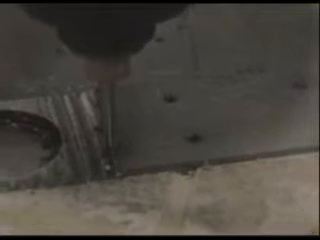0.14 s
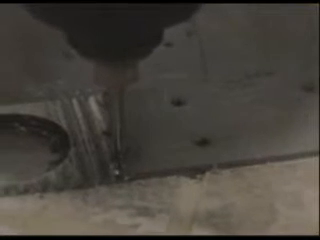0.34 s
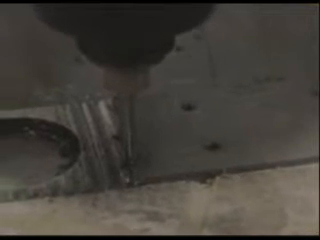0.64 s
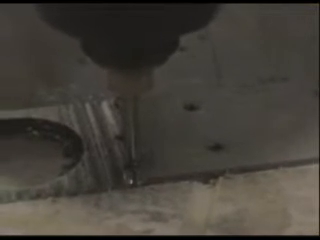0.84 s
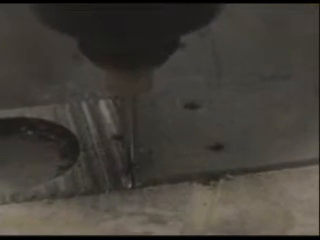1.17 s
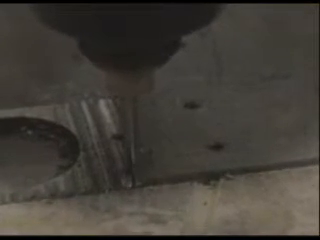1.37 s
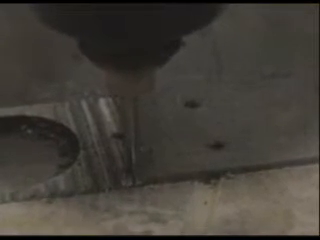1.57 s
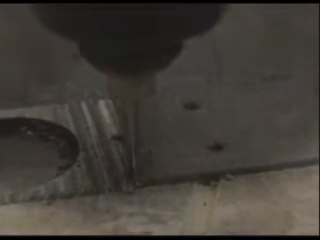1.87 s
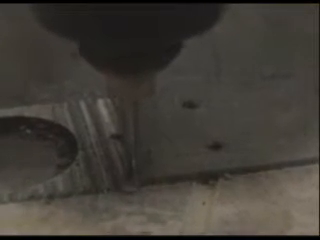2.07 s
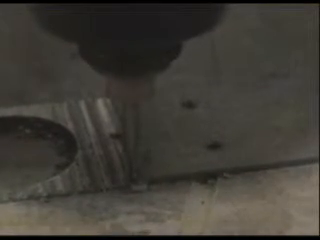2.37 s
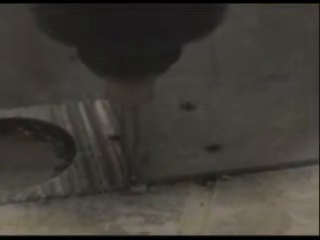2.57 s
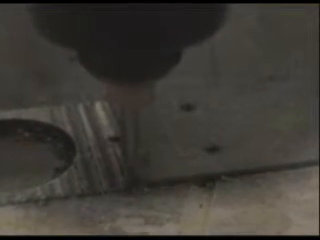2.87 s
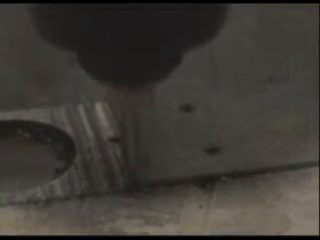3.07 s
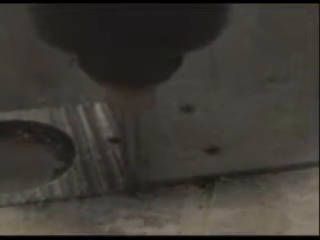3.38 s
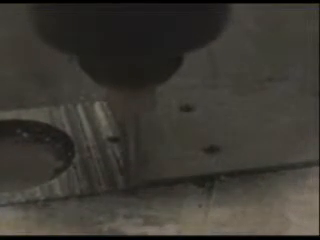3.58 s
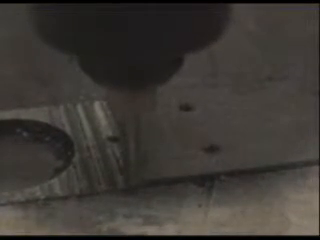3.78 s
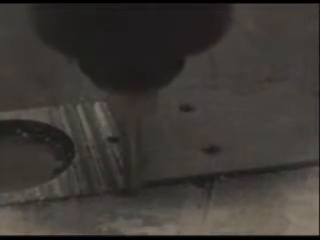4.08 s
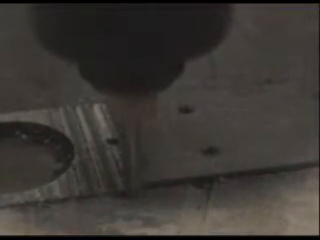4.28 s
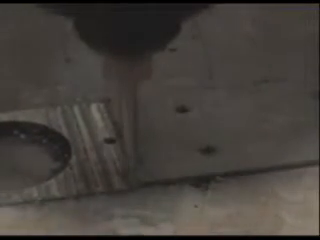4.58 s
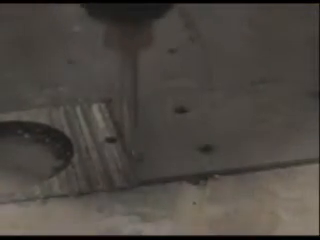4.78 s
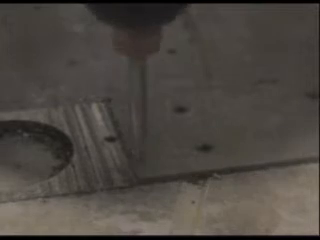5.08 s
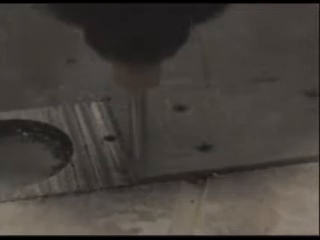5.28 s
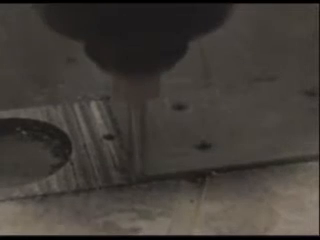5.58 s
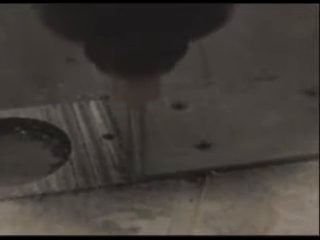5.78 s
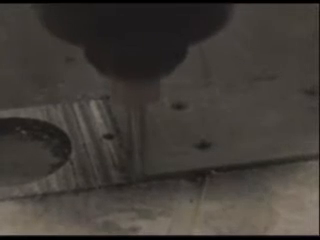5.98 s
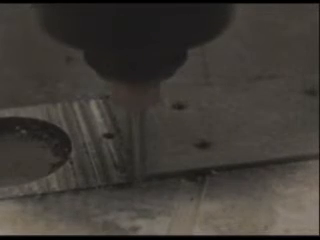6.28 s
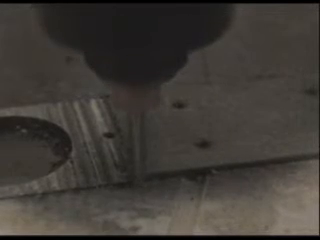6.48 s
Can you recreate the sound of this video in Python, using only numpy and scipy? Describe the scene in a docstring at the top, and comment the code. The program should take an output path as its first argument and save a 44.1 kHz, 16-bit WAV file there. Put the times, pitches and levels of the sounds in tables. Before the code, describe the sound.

From 0 s a small cutter mills steel at close range: a loud, dense buzz around 430 Hz and its upper partials, with gritty chip noise, tiny ticks and metallic ringing near 5 kHz. Beneath it, a spindle motor whines near 2.5 kHz with a throbbing rasp and broad fan rush. Short screechy snags come at about 1.5, 2.0, 2.4 and 2.7 s. At 2.85 s the cutter breaks out with a brief squeal; the buzz drops away, and a rougher rubbing drone swells around 3.1 s, with last scrapes until 3.5 s. The spindle then runs free, whine and air more exposed, thin steady tones above 5 kHz. From 4.33 to 5.3 s three quiet axis-motor hums glide up and down, with frame jolts near 4.4, 5.05 and 5.27 s and soft microphone thumps. Whirring continues to 6.6 s. Close stereo, mostly left-leaning, with short diffuse reflections and faint handling rumble.

```python
"""Workshop, close stereo microphones: a CNC router mills steel plate with a small two-flute cutter.
From the start the flutes bite twice a turn, as shaft-locked partials, gritty noise and a ringing cutter.
The motor whines at its commutator rate and blows filtered noise throughout, over handling rumble.
At 2.85 s the tool breaks out and squeals, rubs once a turn, then runs free as thin drive tones stand out.
From 4.33 s an axis motor lifts the head and lowers it again: three gliding hums, with jolts of the frame."""
import sys
import numpy as np
from scipy import signal
from scipy.fft import rfft, irfft, next_fast_len
from scipy.io import wavfile

SR = 44100
rng = np.random.default_rng(int(sys.argv[2]) if len(sys.argv) > 2 else 0)


def unload_audio(sound):
    """Save the sound as a 16-bit wav file, at the path given as the first command line argument."""
    columns = np.transpose(np.atleast_2d(sound))
    # keep every value between -1 and 1, then stretch to whole-number steps
    steps = np.round(np.clip(columns, -1, 1) * 32767)
    wavfile.write(sys.argv[1], SR, steps.astype(np.int16))


N = 292824
TIME = np.arange(N) / SR

# Flutes biting, before the levels of the parts: t/s, level/dB
BITE_LEVEL = [(0, -28.5), (.12, -26), (1.47, -26), (1.64, -29), (1.85, -26.5), (1.96, -28.5), (2.5, -25.5),
              (2.69, -27), (2.85, -37.5)]
# Partials while biting: multiple of spindle speed, level/dB relative to the bite
BITE_ORDERS = [(2, -3.5), (3, -20), (4, -2.5), (6, 0.6), (7, -18), (8, -9), (9, -15), (10, -1.5), (11, -11),
               (12, -4.5), (13, -7.5), (14, -12), (15, -10.5), (16, -9.5), (17, -15), (18, -8.5), (19, -21),
               (20, -10.5), (21, -9), (22, -7), (23, -6.5), (24, -6), (25, -13.5), (26, -12), (27, -17.5)]
# Noise colour of the sheared chips: f/Hz, relative level/dB per Hz
CHIP_COLOUR = [(150, -34), (350, -14), (500, -17.5), (580, 5), (750, -15), (950, -11), (1250, -1.5),
               (1550, -5.5), (2300, 1), (3300, -5.5), (4400, -1), (5500, -10.5), (6200, -3.5), (7800, -4.5),
               (8300, -11.5), (8800, -38)]
# Resonances of the cutter under load, and when it only rubs: f/Hz, width/Hz, relative level/dB
CUTTER_MODES = [(4645, 42, 0), (4910, 570, -12), (5073, 49, -1.5), (5460, 53, -12.5)]
SCRAPE_MODES = [(5010, 110, 0)]
# Snags that make the cutter screech: t/s, level/dB, bell width/s
SNAGS = [(1.518, -25, .03), (2.02, -23, .02), (2.43, -28, .015), (2.662, -32, 0.015), (2.79, -27, 0.014),
         (2.851, -21.5, 0.019), (2.963, -25, .025), (3.344, -27, .015), (3.488, -22.5, .018)]
# Recording gain on the background sounds, held down during the cut, recovering after it
# and after jolts: t/s, level/dB
RECORDING_GAIN = [(0, -5), (1.25, -4), (1.65, -5), (2.5, -4.5), (2.79, -2.5), (2.89, -5), (3.35, -3),
                  (3.75, .3), (4.3, 0.5), (5.02, -0.5), (5.1, -2), (5.47, 0), (6.2, -0.55), (6.64, .5)]
# Noise colour of the cooling air: f/Hz, relative level/dB per Hz
AIR_COLOUR = [(60, -73.5), (105, -43), (150, -26.5), (210, -22.5), (330, -16.5), (520, -16.5), (850, -13.5),
              (1250, -8), (1700, -11.5), (2400, -10), (3100, -4.5), (5000, -5.5), (6400, -9.5),
              (7200, -15.5), (7800, -17.5), (8400, -27.5), (8900, -63)]
# Resonances of the air vent, the frame and the brushes: f/Hz, width/Hz, relative level/dB
VENT_MODES = [(4120, 95, 0)]
FRAME_MODES = [(652, 67, -4.5), (1095, 64, 1.5), (1225, 116, -3)]
BRUSH_MODES = [(2920, 83, 0)]
# Commutator whine split by the rectified mains: ripple sideband number, relative level/dB
WHINE_SIDEBANDS = [(0, -2), (1, 2), (2, 4), (3, -2.5), (4, -8.5)]
# Noise colour of handling: f/Hz, relative level/dB per Hz
RUMBLE_COLOUR = [(10, -7), (25, -4), (50, -6.5), (100, -18.5), (200, -36), (500, -85)]
# Soft thumps on the microphone: t/s (each peaks 0.025 s later), level/dB (each sounds 5 dB lower)
THUMPS = [(2.818, -53), (5.022, -47), (5.245, -52), (5.507, -46), (5.689, -50)]
# Steady tones of the axis drives, before their common strength: f/Hz, level/dB
DRIVE_TONES = [(7633, -38.5), (8366, -49.5), (5366, -48)]
# Common strength of the drive tones: t/s, level/dB
DRIVE_LEVEL = [(2.6, -25), (2.9, -8), (3.7, -2.5), (4.6, 3.5), (6.3, -2)]
# Partials while rubbing: multiple of spindle speed, level/dB relative to the rub
RUB_ORDERS = [(2, -20.5), (3, -15), (4, -8.5), (5, -6), (6, -.5), (7, -14.5), (8, -4.5), (9, -10),
              (10, -15.5), (11, -13.5), (22, -11), (23, -10), (24, -12)]
# Squeal as the tool catches: multiple of spindle speed, level/dB
SQUEAL_ORDERS = [(5, -23), (22, -24.5)]
# Moves of the lift motor: start t/s, length/s, top pitch f/Hz, level/dB before its partials
LIFT_MOVES = [(4.33, .46, 216.3, -44.5), (4.801, .19, 192, -43), (5.03, .28, 252, -41)]
# Hum of the lift motor: multiple of its pitch, level/dB relative to the move
LIFT_ORDERS = [(1, -4), (2, -1), (4, -4)]
# Frame shudders as the axis starts and stops: t/s, level/dB, bell width/s
SHUDDERS = [(4.38, -26, .025), (5.041, -23.5, 0.022), (5.269, -23, 0.015)]
# Noise colour of those shudders: f/Hz, relative level/dB per Hz
JOLT_COLOUR = [(120, -25), (300, -7), (600, 0), (1200, 5.5), (2200, -2.5), (5000, -10), (8500, -31)]
# Place between the microphones, tool and machine: f/Hz, left minus right level/dB
TOOL_PAN = [(200, -1), (430, -1.5), (850, 1.5), (1300, 7.5), (2800, 4.5), (4900, 6), (8400, -1.5)]
MACHINE_PAN = [(200, .5), (550, 6.7), (1100, 3.7), (2800, 4.7), (4900, 3.9), (8400, 2)]
# Diffuse reflections: f/Hz, side level/dB
SPREAD = [(100, 2.5), (400, -11), (1200, -21), (3000, -27.5), (5000, -12), (8000, -11.5)]

# Spindle speed, turns a second: running free, sag at full load, overshoot when the load lets go
FREE_HZ, SAG_HZ, OVERSHOOT_HZ = 214.5, 1.3, 1.0
FULL_BITE_DB = -26
BEAT_HZ = 196.55  # the sound throbs at the spindle speed minus this
# Breakout from the cut, and the time the spindle takes to settle
BREAKOUT_S, SETTLE_S = 2.85, 0.1666
SQUEAL_RISE_S, SQUEAL_FALL_S = 0.019, 0.035
# Rubbing past the wall of the cut: closest moment, rise, fall, level
RUB_S, RUB_RISE_S, RUB_FALL_S, RUB_DB = 3.13, 0.23, 0.18, -23.5
# Cutter ringing: under full load, at the firmest rub, random swing
RING_BITE_DB, RING_RUB_DB, RING_SWING_DB = -28.5, -30.5, 1.5
AIR_DB, WHINE_DB, FRAME_DB, WHINE_SWING = -20.5, -24.5, -29.5, 1.47
# Shaft hum, and its swell at the breakout
HUM_DB, HUM_SWELL_DB, HUM_RISE_S, HUM_FALL_S = -49, 4, 0.16, 0.3
# Commutator bars, and the ripple of the rectified mains
BARS, RIPPLE_HZ = 12, 120
LIFT_START_HZ = 125
# Quick unsteadiness of the bite and of the background level
BITE_SWING_DB, BACKGROUND_SWING_DB = 0.4, 0.62
TOP_HZ = 8850  # band limit of the recorder


def amp(db):
    """Amplitude for a level in dB."""
    return 10 ** (np.asarray(db) / 20)


def unit(x):
    """x scaled to rms 1."""
    return x / np.sqrt(np.mean(x ** 2) + 1e-20)


def along(points, hz):
    """Value at each frequency, interpolated on a log axis."""
    f, value = np.transpose(points)
    return np.interp(np.log(hz + 1), np.log(f + 1), value)


def curve(rows):
    """One value per sample, straight between the rows."""
    t, value = np.transpose(rows)
    return np.interp(TIME, t, value)


def until(rows, fade):
    """Gain that dies away after the last row of a curve."""
    return np.exp(-np.maximum(TIME - rows[-1][0], 0) / fade)


def swell(s, length):
    """A bell-shaped rise and fall around s."""
    return np.exp(-.5 * ((TIME - s) / length) ** 2)


def arch(s, rise, fall):
    """A rounded peak at s with its own rise and fall times."""
    return np.where(TIME < s, swell(s, rise), swell(s, fall))


def wobble(rate):
    """A smooth random curve through rate knots a second."""
    knots = rng.standard_normal(int(N * rate / SR) + 4)
    smooth = signal.resample_poly(knots, 6, 1)
    places = np.linspace(0, len(knots), len(smooth), endpoint=False)
    return 0.89 * np.interp(TIME * rate, places, smooth)


def filtered(x, response):
    """x times a complex response of frequency."""
    m = next_fast_len(N + SR // 4)
    spectrum = rfft(x, m) * response(np.fft.rfftfreq(m, 1 / SR))
    return irfft(spectrum, m)[..., :N]


def coloured(x, colour):
    """x with the given spectrum, at rms 1."""
    return unit(filtered(x, lambda hz: amp(along(colour, hz))))


def ringing(x, modes):
    """x through resonances whose signs alternate, at rms 1."""
    def response(f):
        total = 0
        for k, (centre, width, db) in enumerate(modes):
            damping = 1j * f * width
            total = total + (-1) ** k * amp(db) * damping / (centre ** 2 - f ** 2 + damping)
        return total
    return unit(filtered(x, response))


def noise():
    """Fresh white noise."""
    return rng.standard_normal(N)


def bursts(cycles, sharpness):
    """A gate of rms 1 that opens once a cycle."""
    return unit(np.exp(sharpness * np.cos(2 * np.pi * cycles)))


def partials(turns, orders, flutter_db, flutter_rate):
    """Lines locked to the shaft, each fluttering on its own; 0 dB is rms 1."""
    total = np.zeros(N)
    for order, db in orders:
        flutter = amp(flutter_db * wobble(flutter_rate))
        line = np.sin(2 * np.pi * (order * turns + rng.random()))
        total += amp(db) * unit(flutter * line)
    return total


def cutting(turns, bite, beat):
    """Each flute shears a chip: a buzz strongest on even orders, gritty noise and ticks of flying chips."""
    uneven = turns + 0.0042 * wobble(160)  # the flutes meet the steel slightly early or late
    low = [row for row in BITE_ORDERS if row[0] < 5]
    loudest = [row for row in BITE_ORDERS if row[0] == 6]
    high = [row for row in BITE_ORDERS if row[0] > 6]
    buzz = partials(uneven, low, flutter_db=0.82, flutter_rate=25)
    chatter = partials(uneven, loudest, flutter_db=0.45, flutter_rate=45)
    edge = partials(uneven, high, flutter_db=2.0, flutter_rate=55)
    # the loudest partial throbs with the beat and its octaves
    throb = unit(1 + .38 * np.sin(beat) + .22 * np.cos(2 * beat) + .22 * np.sin(4 * beat))
    grit = noise() * bursts(2 * turns, sharpness=0.27) * amp(2.6 * wobble(900))
    ticks = unit(noise() * (rng.random(N) < 25 / SR))  # about 25 a second
    chips = coloured(grit + amp(-17.5) * ticks, CHIP_COLOUR)
    return bite * (buzz + throb * chatter + amp(-1) * edge + amp(-2.0) * chips)


def screech(turns, load, touch):
    """The slender cutter rings: twice a turn under load, once and more broadly when it only rubs."""
    steady = amp(RING_BITE_DB) * load + amp(RING_RUB_DB) * touch
    steady = steady * amp(RING_SWING_DB * wobble(18))
    snags = sum(amp(db) * swell(s, length) for s, db, length in SNAGS)
    biting = ringing(noise() * bursts(2 * turns, sharpness=1.5), CUTTER_MODES)
    scraping = ringing(noise() * bursts(turns, sharpness=1.3), SCRAPE_MODES)
    ring = np.sqrt(load) * biting + np.sqrt(1 - load) * scraping
    return np.hypot(steady, snags) * ring


def cooling_air(gain_db):
    """The fan's turbulent rush and vent resonance, combed by a reflection off the steel plate."""
    rush = coloured(noise() * amp(1.1 * wobble(1500)), AIR_COLOUR)
    rush = rush + amp(-11.5) * ringing(noise(), VENT_MODES)
    # the faint reflection arrives 1/512 s late
    combed = filtered(rush, lambda hz: 1 + 0.037 * np.exp(-2j * np.pi * hz / 512))
    return amp(AIR_DB + gain_db) * combed


def commutator_whine(turns, beat, gain_db):
    """The bars passing the brushes whine, with sidebands and sparks pulsing with the rectified mains."""
    ripple = RIPPLE_HZ * TIME
    lines = sum(amp(db) * np.cos(2 * np.pi * (BARS * turns + k * ripple)) for k, db in WHINE_SIDEBANDS)
    sparks = ringing(noise() * bursts(ripple, sharpness=.9), BRUSH_MODES)
    swing_db = 1.3 * wobble(35) + 1.9 * np.sin(beat) + .8 * np.cos(2 * beat)
    rasp = (unit(lines) + amp(-12) * sparks) * amp(swing_db)
    return amp(WHINE_DB + WHINE_SWING * gain_db) * unit(rasp)


def motor(turns, beat, gain_db):
    """Fan air and commutator whine, with the shaken frame and a hum once per turn of the shaft."""
    frame = amp(FRAME_DB + gain_db + .5 * wobble(7.4)) * ringing(noise(), FRAME_MODES)
    hum_db = HUM_DB + HUM_SWELL_DB * arch(BREAKOUT_S, HUM_RISE_S, HUM_FALL_S)
    hum = amp(hum_db) * unit(np.sin(2 * np.pi * turns) * amp(1.0 * wobble(14)))
    return cooling_air(gain_db) + frame + hum + commutator_whine(turns, beat, gain_db)


def handling(gain_db):
    """Faint lumpy rumble, under the same recording gain as the motor, and thumps on the hand-held microphone."""
    rumble = amp(-72.5 + gain_db + 7 * wobble(28))
    thumps = sum(amp(db - 5) * swell(s + .025, 0.014) for s, db in THUMPS)
    return (rumble + thumps) * coloured(noise(), RUMBLE_COLOUR)


def drives():
    """The axis drives sing thinly, on steady tones whose phase wanders a little."""
    tones = np.zeros(N)
    for hz, db in DRIVE_TONES:
        tones += amp(db) * unit(np.sin(2 * np.pi * hz * TIME + .8 * wobble(50)))
    return amp(curve(DRIVE_LEVEL)) * tones


def rubbing(turns, touch):
    """Leaving the cut, the tool catches and squeals for a moment; then only the proudest flute touches."""
    drone = amp(RUB_DB) * touch * partials(turns, RUB_ORDERS, flutter_db=1.3, flutter_rate=47)
    catch = arch(BREAKOUT_S, SQUEAL_RISE_S, SQUEAL_FALL_S)
    squeal = catch * partials(turns, SQUEAL_ORDERS, flutter_db=1.0, flutter_rate=90)
    return drone + squeal


def lift():
    """The lift motor's hum rises and falls with its speed in each move; starts and stops jolt the frame."""
    pitch, gain = np.full(N, float(LIFT_START_HZ)), np.zeros(N)
    for s, length, top_hz, db in LIFT_MOVES:
        pace = np.abs(np.sin(np.pi * np.clip((TIME - s) / length, 0, 1)))
        pitch += (top_hz - LIFT_START_HZ) * pace
        gain += amp(db) * np.sqrt(pace)
    lift_turns = np.cumsum(pitch) / SR
    hums = gain * partials(lift_turns, LIFT_ORDERS, flutter_db=5.5, flutter_rate=18)
    jolts = sum(amp(db) * swell(s, length) for s, db, length in SHUDDERS)
    return hums + jolts * coloured(noise(), JOLT_COLOUR)


def placed(x, pan):
    """Stereo: the direct sound panned, plus bed and wall reflections of opposite sign left and right."""
    t = TIME[:SR // 8]
    walls = rng.standard_normal(len(t)) * amp(-60 * t / 0.12)  # 60 dB down in 0.12 s
    echo = signal.fftconvolve(x, walls / np.linalg.norm(walls))[:N]
    side = filtered(echo, lambda hz: amp(along(SPREAD, hz)))
    direct = filtered(x, lambda hz: 2 / (1 + amp(np.outer([-1, 1], along(pan, hz)))))
    return direct + np.array([side, -side])


def scene():
    """Tool and motor share one shaft, both mostly nearer the left microphone; handling is central."""
    bite = amp(curve(BITE_LEVEL) + BITE_SWING_DB * wobble(11.9)) * until(BITE_LEVEL, fade=0.013)
    load = np.clip(bite / amp(FULL_BITE_DB), 0, 1)
    touch = arch(RUB_S, RUB_RISE_S, RUB_FALL_S)
    gain_db = curve(RECORDING_GAIN) + BACKGROUND_SWING_DB * wobble(12)
    # the spindle sags under load and overshoots once freed; the changing chip load makes it waver
    speed = FREE_HZ - SAG_HZ * load + OVERSHOOT_HZ * arch(BREAKOUT_S, SQUEAL_RISE_S, SETTLE_S)
    waver = (.05 + .18 * load) * wobble(22)
    turns = np.cumsum(speed + waver) / SR
    # the beat slackens as the spindle sags
    beat = 2 * np.pi * (turns - BEAT_HZ * TIME)
    tool = cutting(turns, bite, beat) + screech(turns, load, touch) + rubbing(turns, touch)
    machine = motor(turns, beat, gain_db) + drives() + lift()
    return placed(tool, TOOL_PAN) + placed(machine, MACHINE_PAN) + handling(gain_db)


def record(dry):
    """The recorder cuts off steeply above its band limit."""
    return filtered(dry, lambda hz: 1 / np.sqrt(1 + (hz / TOP_HZ) ** 400))


dry = scene()
out = record(dry)
unload_audio(out)
```